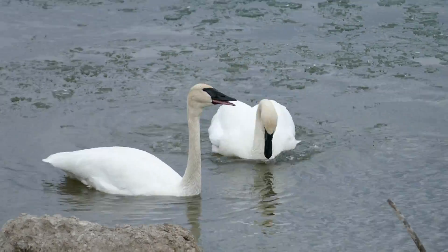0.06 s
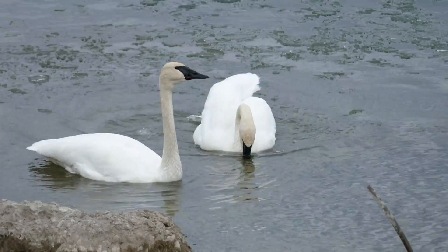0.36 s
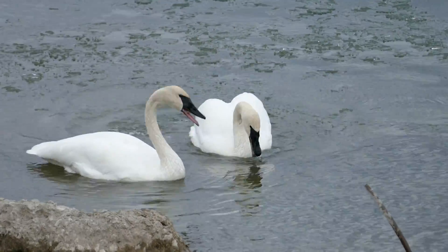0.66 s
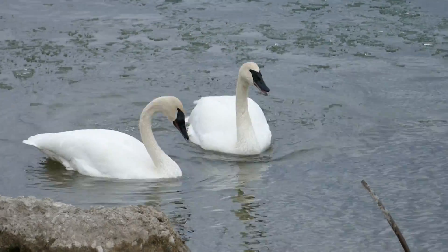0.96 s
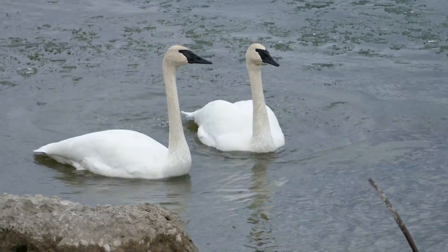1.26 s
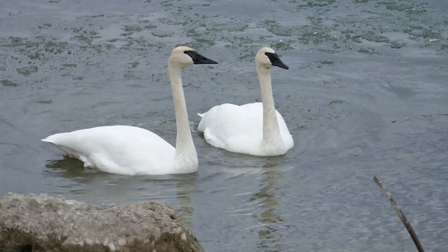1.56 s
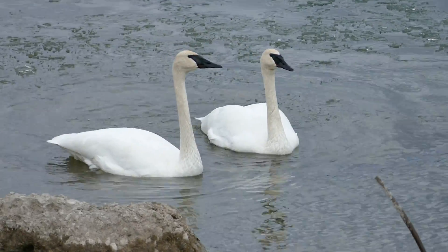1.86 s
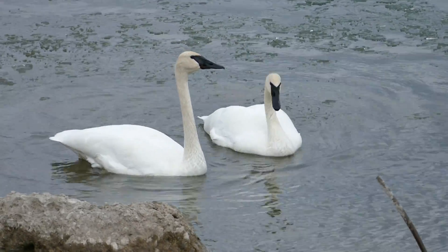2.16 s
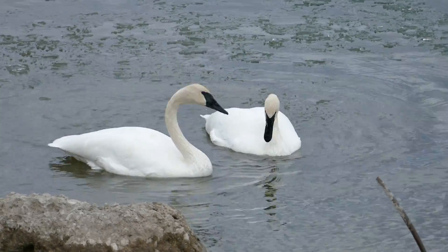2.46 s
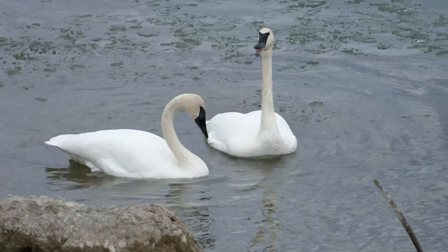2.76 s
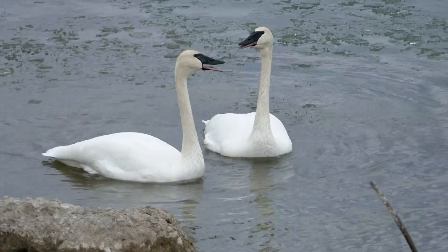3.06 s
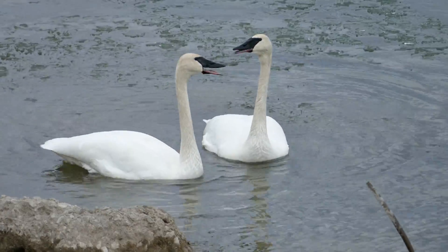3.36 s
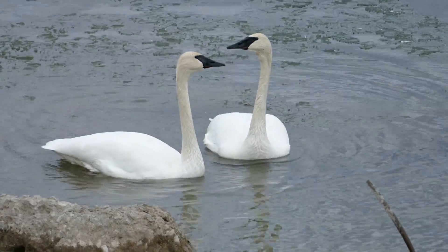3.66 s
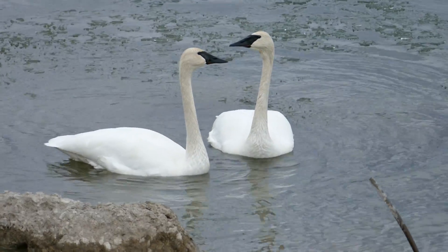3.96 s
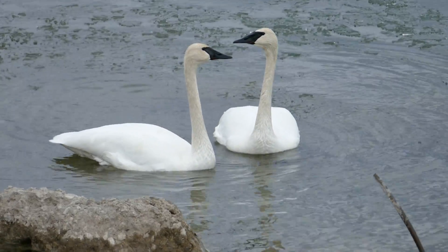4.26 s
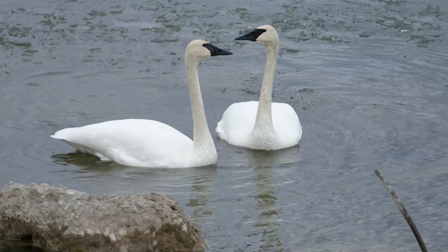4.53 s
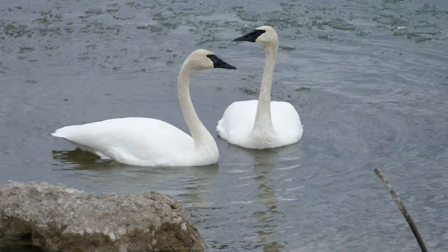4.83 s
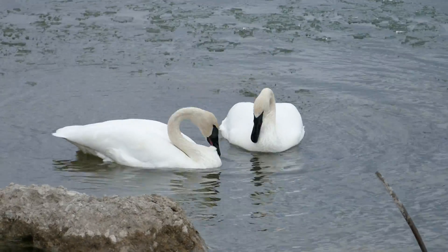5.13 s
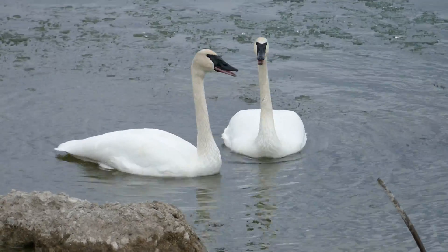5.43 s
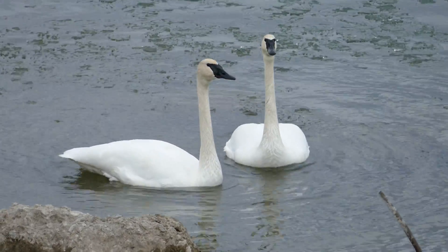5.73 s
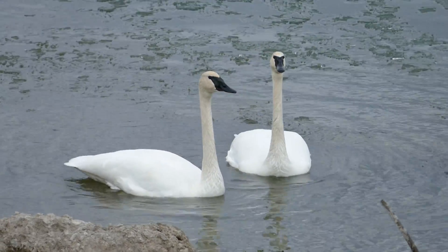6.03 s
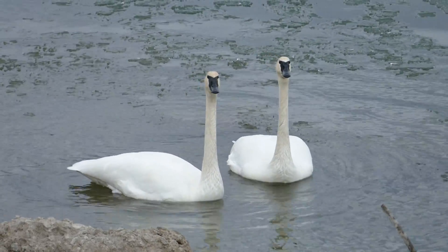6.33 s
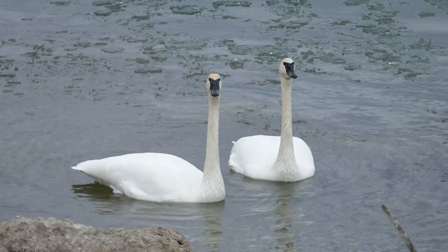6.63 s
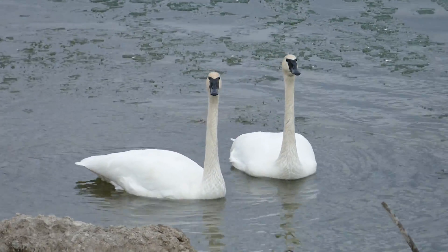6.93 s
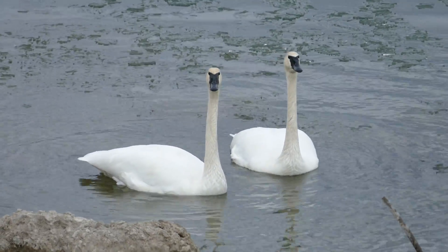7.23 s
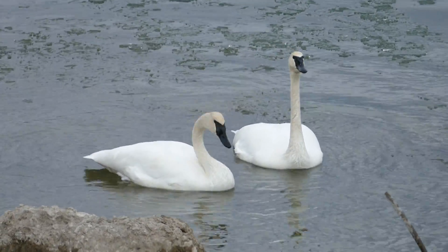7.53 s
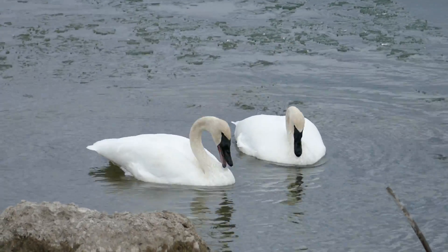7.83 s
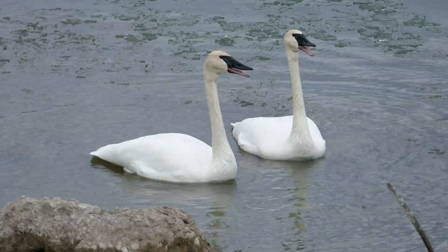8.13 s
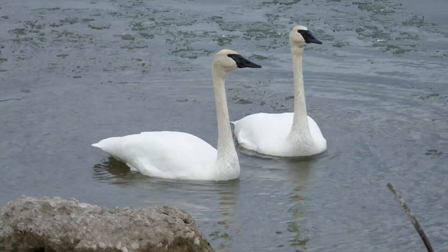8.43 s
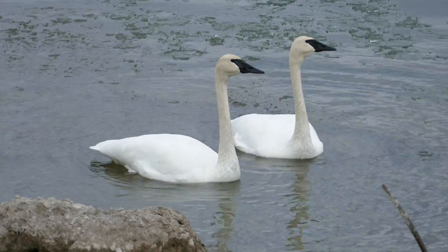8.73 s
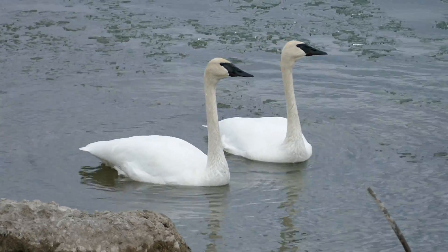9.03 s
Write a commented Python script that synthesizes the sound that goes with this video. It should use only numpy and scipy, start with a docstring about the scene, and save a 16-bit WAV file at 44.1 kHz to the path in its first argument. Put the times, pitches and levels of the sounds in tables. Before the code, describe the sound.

Two swans honk close by on a pond, straight ahead of the microphone. Their short, raspy, trumpet-like notes come in four quick bursts separated by pauses of about two seconds, the second burst the longest, with a slight echo from the banks. Distant traffic and a low engine hum run steadily underneath. A far songbird, a few faint drips and swishes, and light wind gusts on the microphone fill the gaps.

```python
"""Short trumpet-like honks, close and straight ahead: two swans greet each other in bursts on a pond,
and the banks echo them. Each honk is a buzzing pulse train in a long windpipe: raspy as it catches,
clear in the middle, sagging as it ends. Distant traffic and an engine hum lie underneath, with a far
songbird, a few drips and swishes, a faint high hiss and light gusts on the stereo microphone."""
import sys
import numpy as np
from scipy import signal
from scipy.fft import rfft, irfft, next_fast_len
from scipy.io import wavfile
from scipy.ndimage import map_coordinates

SR = 44100
rng = np.random.default_rng(int(sys.argv[2]) if len(sys.argv) > 2 else 0)


def store_pcm(level_fs):
    """Save levels as 16-bit WAV."""
    pcm = np.round(np.clip(level_fs, -1, 1) * 32767).astype(np.int16)
    wavfile.write(sys.argv[1], SR, np.atleast_2d(pcm).T)


N = 409688
TIME = np.arange(N) / SR
LEAD_S = .012   # a soft low croak scoops up into each honk


def from_db(db):
    """Decibels to gain."""
    return 10 ** (np.asarray(db) / 20)


def rms_one(x):
    """Scale to unit rms."""
    return x / np.sqrt(np.mean(x ** 2) + 1e-20)


def at_hz(points, hz):
    """Read a curve on a log-frequency axis."""
    freqs, values = np.transpose(points)
    return np.interp(np.log(hz), np.log(freqs), values)


def drift(rate, size=N):
    """Smooth random wander of spread about 1, turning about rate times a second."""
    at = np.arange(size) * rate / SR
    return map_coordinates(rng.standard_normal(2048), [at[::8] % 2047], order=2).repeat(8)[:size]


def flutter(rate, count, size):
    """Unrelated wanders of spread about 1, one row for each overtone."""
    at = np.arange(count)[:, None] * 256 + np.arange(size)[::4] * rate / SR
    return map_coordinates(rng.standard_normal(32768), [at], order=1).repeat(4, 1)[:, :size]


def resonate(x, hz, width):
    """A steep-sided resonance."""
    low = np.sqrt(hz ** 2 + (width / 2) ** 2) - width / 2
    high = min(low + width, SR / 2 - 100)
    return signal.sosfilt(signal.butter(2, [low, high], "band", fs=SR, output="sos"), x)


def add(track, s, sound):
    """Mix a sound in at s seconds."""
    at = round(s * SR)
    sound, at = sound[max(-at, 0):], max(at, 0)
    track[at:at + len(sound)] += sound[:N - at]


def swells(rows):
    """Gain over time of bell-shaped swells that add in power."""
    return np.sqrt(sum(from_db(db) ** 2 * np.exp(-np.minimum(((TIME - s) / half) ** 2, 50))
                       for s, half, db in rows))


def banded_noise(spectrum, flicker_db, top_hz, together):
    """Third-octave bands of stereo noise, each with its own flicker and left-right likeness; rms 1."""
    # Each row: frequency in Hz, likeness of left and right from 0 to 1.
    likeness = [(30, 0.91), (80, 1), (160, 0.98), (300, 1), (800, 0.41), (2000, 0.51), (6000, 0.37),
                (14000, 0.3)]
    out, edges = 0, 25 * 2 ** (np.arange(29) / 3)
    edges = edges[edges < top_hz]
    white = rng.standard_normal((2, 2, N))
    for k, (low, high) in enumerate(zip(edges, edges[1:])):
        hz = np.sqrt(low * high)
        mid, side = resonate(white[k % 2], hz, high - low)
        alike = np.clip(together * at_hz(likeness, hz), -1, 1)
        gain = from_db(at_hz(spectrum, hz) + flicker_db * drift(14))
        out = out + gain * (np.sqrt(1 + alike) * mid + np.sqrt(1 - alike) * side * [[1], [-1]])
    return rms_one(out)


def membranes(pitch, rasp, k):
    """Overtones k of a swan's buzzing membranes; rasp jitters the pitch and shakes the high ones most."""
    size = len(pitch)
    phase = 2 * np.pi * np.cumsum(pitch * (1 + .04 * rasp * drift(400, size))) / SR
    shake = flutter(450, len(k), size) + 1j * flutter(450, len(k), size)
    shimmer_db = 2.3 * np.minimum(k / 5, np.sqrt(k / 5).clip(1, 1.7)) * flutter(45, len(k), size)
    return np.exp(1j * k * phase) * (1 + rasp * np.sqrt(k / 10) * shake) * from_db(shimmer_db)


def breath(t, lead, length, attack):
    """The pressure behind a honk: weak in the croak, overshooting as the note bursts out, then fading."""
    ring_up_s, kick_s, fade_s = .001, .0097, min(.045, length)
    rise = np.clip((t + ring_up_s / 3) / (attack + ring_up_s), 0, 1)   # the windpipe takes time to speak
    kick = 1 + .35 * np.exp(-np.abs(t) / kick_s)
    fade = np.sin(np.pi / 2 * np.clip((length - t) / fade_s, 0, 1)) ** 1.33
    return np.maximum(rise, .053 * (1 - lead)) * kick * fade


def honk(length, attack, pitch_hz, sag_hz, horn_db, throat_db, brass_db, buzz_db, brass_hz, opening, rough):
    """One note: the membranes' overtones pass through resonances; neck and beak shift the colour."""
    # Resonances of the honk as heard: windpipe tones below (fundamental, horn, throat, brass, upper
    # brass), two bright treble peaks of the microphone above (edge, fizz), and a faint top. Each row:
    # centre in Hz, width in Hz, level offset in dB, share of the beak opening, steepness of the fade.
    resonances = [(483, 170, 3, -0.09, 0.99), (854, 235, 2.5, -0.31, 0.55), (1420, 620, 0, .15, 1.0),
                  (3064, 840, 3, 0.12, 1.085), (4010, 1900, 3, 0.93, 1.5), (6320, 570, 7.5, 0.82, 2.1),
                  (9170, 910, 9, 0.17, 1.5), (11560, 590, 1.5, .3, 1.2)]
    # Dips in the honk's tone colour. Each row: centre in Hz, width in Hz, gain in dB.
    nulls = [(2095, 140, -17.5), (4950, 620, -11), (7720, 1300, -13)]
    t = np.arange(int((LEAD_S + length) * SR)) / SR - LEAD_S
    progress, size = np.clip(t / length, 0, 1), len(t)
    lead = np.clip(-t / LEAD_S, 0, 1)
    rasp = rough * (.5 + 2.5 * np.exp(-np.abs(t) / .013))   # the membranes rattle before they lock in
    arch = np.polyfit([0, .5, 1], [pitch_hz - .13 * sag_hz, pitch_hz, pitch_hz - sag_hz], 2)
    pitch = np.polyval(arch, progress) * (1 - .13 * lead)
    k = np.arange(1, 36)[:, None]
    overtone_hz = k * pitch
    dips = from_db(sum(db * np.exp(-((overtone_hz - hz) / width) ** 2) for hz, width, db in nulls))
    overtones = membranes(pitch, rasp, k) * dips
    pressure = breath(t, lead, length, attack)
    beak_db = opening * np.clip(2 * (progress - .35), -1, .6)
    bass_db = -31.5 + .31 * (horn_db + 24)   # the fundamental hardly grows with the horn
    edge_db = -43.5 + 1.6 * (buzz_db + 43.5)   # the hard edge grows faster than the buzz
    colour = [bass_db, horn_db, throat_db, brass_db,
              (brass_db + edge_db) / 2, edge_db, buzz_db, (edge_db + buzz_db) / 2]
    brass_glide = np.interp(progress, [.1, .6], [3050, brass_hz]) / resonances[3][0]
    shifts = [1, 1, 1, brass_glide, 1, 1, 1, 1]
    out = 0
    for (hz, width, db, share, steepness), colour_db, shift in zip(resonances, colour, shifts):
        centre = hz * shift * (1 + .025 * drift(21, size))
        detune = ((overtone_hz - centre ** 2 / overtone_hz) / width)[:, ::8]
        response = (1 / (1 + 1j * np.sqrt(2) * detune - detune ** 2)).repeat(8, 1)[:, :size]
        # Uneven pulses ring the upper resonances unevenly.
        rattle = from_db(3.2 * np.minimum(rasp, .6) * min(hz / 2000, 1) * drift(170, size))
        ring = rms_one((overtones * response).real.sum(0) * rattle)
        out = out + ring * from_db(db + colour_db + share * beak_db) * pressure ** steepness
    return out


def swans():
    """The pair honking on the water, near the microphone."""
    # Each row: start, length and attack in seconds, pitch and final sag in Hz, relative levels of horn,
    # throat, brass and treble buzz in dB, Hz to which the brass glides, beak opening in dB, roughness 0-1.
    honks = [(0, 0.073, 0.00033, 442, 14, -37.5, -30.5, -38, -51.5, 2580, -8, 0.083),
             (0.514, 0.054, 0.003, 332.3, 16, -35.5, -73, -54.5, -70.5, 2980, -10, 0.47),
             (.633, 0.015, .003, 403, 0, -34, -33, -53, -66, 3000, -16, 0.35),
             (.644, 0.067, 0.0037, 481.4, 11, -17, -22.5, -34.5, -48, 4040, -1.5, 0.22),
             (.788, 0.015, 0.0068, 396.4, 4, -27.5, -54, -40, -76, 2980, -36, 0.38),
             (.802, 0.047, 0.0023, 467.6, 29, -19, -26, -31.5, -57.5, 2670, -18, 0.34),
             (2.705, 0.075, 0.0039, 466, 43, -26.5, -31.5, -28.5, -44.5, 2020, 9.5, .33),
             (2.836, 0.074, 0.0019, 465, 39, -29.5, -26.5, -26, -38, 3190, 5.5, 0.21),
             (3.013, 0.02, 0.0056, 455, 16, -28.5, -25.5, -32, -47, 3240, -16.5, .32),
             (3.033, 0.089, 0.01, 447.7, 27.5, -30, -26, -32, -51, 2970, 2, 0.21),
             (3.154, .058, 0.0033, 434, 12, -33.5, -32.5, -46, -82, 2700, -12, 0.13),
             (3.22, 0.079, 0.04, 438, 5, -27, -26.5, -33, -55, 2830, 12, .1),
             (3.367, .063, 0.017, 435, 6.5, -28.5, -29.5, -37, -54, 2890, 7, 0.54),
             (3.529, .045, 0.0032, 441, 16, -32.5, -34, -47, -79, 2900, -2, 0.15),
             (5.182, .094, 0.015, 475.2, 32, -21.5, -30, -30, -44.5, 3900, 1, 0.27),
             (5.33, 0.079, .0013, 463.5, 31, -20.5, -23.5, -27.5, -53.5, 2800, 4, .2),
             (5.477, .066, 0.0028, 476, 44, -26.5, -52, -24.5, -40.5, 2340, 15.5, 0.21),
             (5.639, .026, 0.009, 432.4, 40, -31.5, -30, -37, -65, 3100, 8, 0.19),
             (7.966, 0.068, .004, 454.7, 24.5, -21.5, -34, -42, -56.5, 3206, -3, 0.14),
             (8.104, 0.1, 0.011, 476.3, 30.5, -24, -53, -24, -40.5, 2480, 17, .24),
             (8.254, .066, 0.0026, 462.6, 29, -29, -25, -27, -40, 3070, 8, 0.33)]
    out = np.zeros(N)
    for s, *note in honks:
        add(out, s - LEAD_S, honk(*note))
    return out


def ports(x):
    """A near sound reaches the two microphone ports slightly out of phase."""
    # Each row: frequency in Hz, lead of the left port in radians.
    port_phase = [(0, .17), (1120, .32), (1980, -1.3), (2240, .8), (3960, -1), (4820, 0.83), (5250, .51),
                  (9820, .1), (11000, .45), (16000, .5)]
    size = next_fast_len(N)
    turn = np.interp(np.fft.rfftfreq(size, 1 / SR), *np.transpose(port_phase))
    return irfft(rfft(x, size) * np.exp(.5j * turn * [[1], [-1]]), size)[:, :N]


def shore(x, scatter_db, t60, dull_hz):
    """A few echoes from the banks, then thin scatter from reeds and trees."""
    # Each row: echo delay in seconds, level in dB before the treble is dulled.
    banks = [(0.019, -16), (0.055, -34.5), (0.093, -36)]
    t = np.arange(int(.7 * SR)) / SR
    reply = rng.standard_normal((2, len(t))) * from_db(-60 * t / t60) * np.minimum(t / .072, 1)
    reply *= from_db(scatter_db) / np.sqrt(np.sum(reply[0] ** 2))
    for delay, db in banks:
        arrivals = (SR * (delay + rng.uniform(0, .0004, 2))).astype(int)
        reply[[0, 1], arrivals] += from_db(db)
    reply = signal.sosfilt(signal.butter(1, dull_hz, fs=SR, output="sos"), reply)
    return signal.fftconvolve(x[None], reply, axes=1)[:, :N]


def traffic():
    """A distant road rumbles steadily; at first one vehicle adds to it and recedes."""
    # Each row: frequency in Hz, relative noise density in dB.
    spectrum = [(25, -34), (60, -16), (108, -8.5), (170, -4), (236, -0.5), (400, -5.5), (600, -7.5),
                (850, -9.5), (1100, -15), (1600, -15.5), (2200, -33.5), (4500, -47), (6200, -47.5),
                (7900, -49.5), (10000, -44), (12500, -48), (16000, -57.5)]
    vehicle_db = 3 * np.exp(-TIME / .43)
    rumble = banded_noise(spectrum, flicker_db=.5, top_hz=18000, together=1)
    return from_db(-43.5 + vehicle_db) * rumble * from_db([[-.4], [.4]])


def tyres(hz, width_hz, db):
    """The narrow drone of far tyres."""
    white = rng.standard_normal(N) + .14 * rng.standard_normal((2, N))
    return from_db(db) * rms_one(resonate(white, hz, width_hz))


def engine(firing_hz, octave_db, waver_db, fade_db_per_s):
    """A far engine's firing rate and its octave waver in the moving air, fading slowly with one swell."""
    # The row: peak time and half length in seconds, level in dB.
    swell = [(2.27, .3, -39.5)]
    phase = 2 * np.pi * np.cumsum(firing_hz * (1 + .0072 * drift(4))) / SR
    firing = np.sin(phase) * from_db(waver_db * drift(3.4))
    octave = np.sin(2 * phase) * from_db(octave_db + waver_db * drift(4.6))
    level = np.hypot(from_db(-47 - fade_db_per_s * TIME), swells(swell))
    return np.sqrt(2) * level * (firing + octave)


def hiss():
    """A faint high hiss comes and goes."""
    # Each row: peak time and half length in seconds, level in dB.
    rises = [(.9, 0.72, -73.5), (2.0, 0.17, -74.5), (2.44, 0.13, -67), (3.8, 0.063, -71),
             (4.62, 0.15, -76.5), (6.03, .08, -75), (6.5, 0.095, -76.5), (8.72, 0.05, -75)]
    # Each row: centre and width in Hz, relative level in dB.
    bands = [(6170, 1200, -6.5), (9800, 1700, -6.5), (8900, 11000, -2.5)]
    white = rng.standard_normal(N) + .17 * rng.standard_normal((2, N))
    return swells(rises) * sum(from_db(db) * rms_one(resonate(white, hz, width)) for hz, width, db in bands)


def whistle(length, from_hz, to_hz, db):
    """One pure gliding note."""
    pitch = np.linspace(from_hz, to_hz, int(length * SR))
    return from_db(db) * np.sin(2 * np.pi * np.cumsum(pitch) / SR) * signal.windows.tukey(len(pitch), .5)


def songbird():
    """A far bird repeats its phrase: a slur, a high slide and a low closing note."""
    # Each row: start and slur length in seconds, the slur's first and last pitch in Hz,
    # slide length in seconds, slur level in dB.
    phrases = [(0.246, 0.054, 1583, 1720, 0.061, -46), (1.157, .032, 1350, 1540, 0.2, -42),
               (3.998, .12, 1560, 1529, 0.086, -44.5), (6.182, 0.032, 1466, 1546, .19, -47.5),
               (8.43, 0.038, 1405, 1580, 0.2, -51)]
    out = np.zeros(N)
    for s, slur, from_hz, to_hz, slide, db in phrases:
        add(out, s, whistle(slur, from_hz, to_hz, db))
        add(out, s + slur, whistle(slide, from_hz=1970, to_hz=1765, db=db - 11))
        add(out, s + slur + 1.3 * slide, whistle(.0475, from_hz=1345, to_hz=1163, db=db - 2))
    return out


def water(grain_db):
    """Drips and soft swishes on the pond: short grainy bursts that die away."""
    # Each row: start, attack and decay in seconds, centre and width in Hz, level in dB.
    drips = [(0.449, 0.0041, 0.0078, 3150, 253.6, -50.5), (0.946, 0.024, 0.016, 3230, 1090, -54.5),
             (1.291, 0.0017, 0.0055, 3940, 900, -58), (1.39, .01, .05, 1550, 1300, -43),
             (1.445, .018, .06, 1450, 1150, -42), (4.55, 0.008, 0.0091, 3870, 350, -63),
             (6.467, 0.00084, .004, 9000, 5940, -61), (8.535, .001, .003, 4890, 3000, -58),
             (8.544, 0.0055, 0.012, 252, 252, -33)]
    out, t = np.zeros(N), np.arange(SR // 3) / SR
    for s, attack, decay, hz, width, db in drips:
        grains = rng.standard_normal(len(t)) * from_db(grain_db * drift(283, len(t)))
        burst = rms_one(resonate(resonate(grains, hz, width), hz, width))
        envelope = np.minimum(t / attack, np.exp(-np.maximum(t - attack, 0) / decay))
        add(out, s, from_db(db) * burst * envelope)
    return out


def wind(breeze_db, lumpy_db):
    """Gusts buffet the microphone in low lumps, partly apart at the two ports and harder on the left."""
    # Each row: peak time and half length in seconds, relative level in dB.
    gusts = [(.97, 0.04, -36), (2.2, 0.5, -39.5), (2.79, 0.064, -38.5), (2.96, 0.031, -35),
             (3.11, 0.1, -34.5), (3.28, 0.077, -38.5), (3.46, 0.11, -36.5), (5.235, 0.044, -37.5),
             (5.305, 0.058, -32), (6.3, 0.31, -50.5), (8.05, 0.043, -40), (8.82, 0.037, -45),
             (9.2, .15, -48)]
    # Each row: frequency in Hz, relative noise density in dB.
    spectrum = [(25, -24), (60, -15.5), (100, -2.5), (160, 1), (300, -7.5), (500, -24), (1200, -29),
                (16000, -90)]
    strength = np.hypot(from_db(breeze_db), swells(gusts))
    lumps = from_db(lumpy_db * np.array([drift(30), drift(30)]))
    buffet = banded_noise(spectrum, flicker_db=-.5, top_hz=1400, together=.6)
    return strength * lumps * buffet * from_db([[1.5], [-2.5]])


def scene():
    """At the pond: the swans near and straight ahead, bird and road far off, wind on the microphone."""
    calls, bird = swans(), songbird()
    pond = ports(calls) + shore(calls, scatter_db=-23.5, t60=.42, dull_hz=4200) + water(grain_db=1)
    far_bird = bird + shore(bird, scatter_db=-1.5, t60=.18, dull_hz=5000)
    road = traffic() + engine(firing_hz=116.9, octave_db=-6, waver_db=2, fade_db_per_s=1.4)
    background = road + hiss() + tyres(hz=824.6, width_hz=93, db=-49.5)
    return pond + far_bird + background + wind(breeze_db=-60.5, lumpy_db=3.5)


def record(dry):
    """The microphone's wind filter thins the deep bass; the top is cut."""
    thinned = signal.sosfilt(signal.butter(2, 45, "high", fs=SR, output="sos"), dry)
    return signal.sosfilt(signal.ellip(10, .1, 80, 15900, fs=SR, output="sos"), thinned)


dry = scene()
out = record(dry)
store_pcm(out)
```